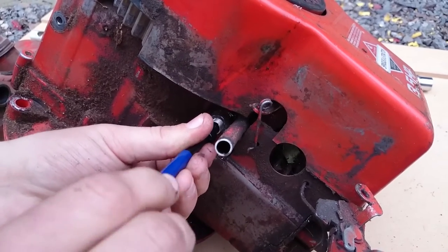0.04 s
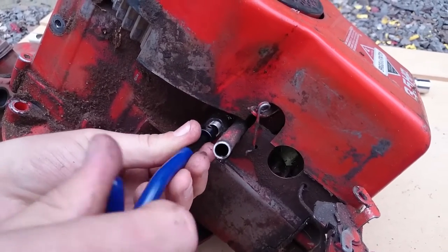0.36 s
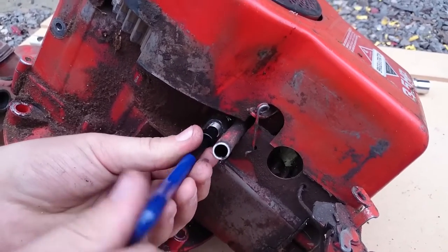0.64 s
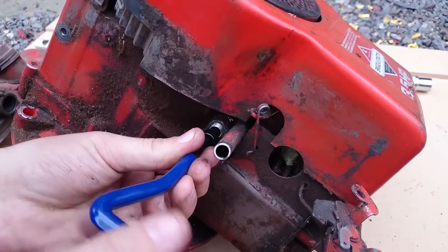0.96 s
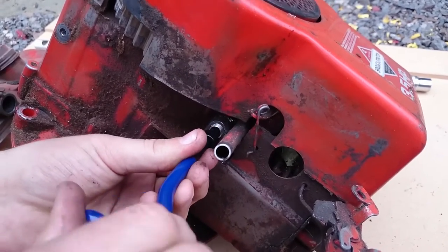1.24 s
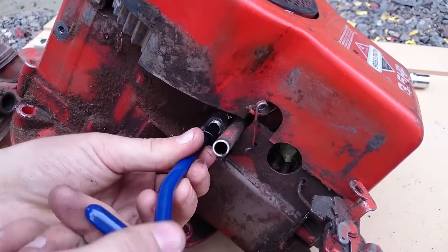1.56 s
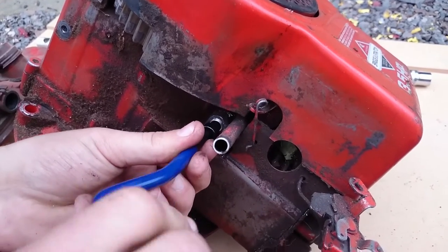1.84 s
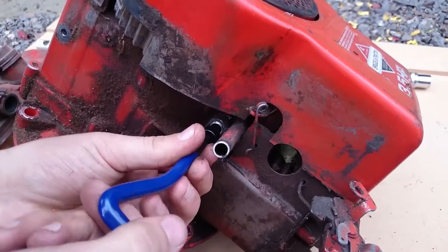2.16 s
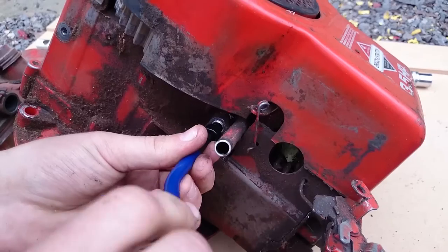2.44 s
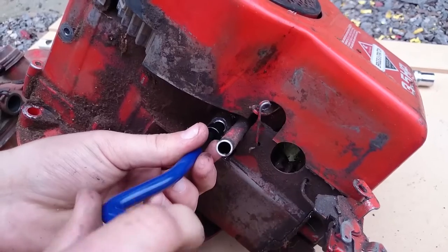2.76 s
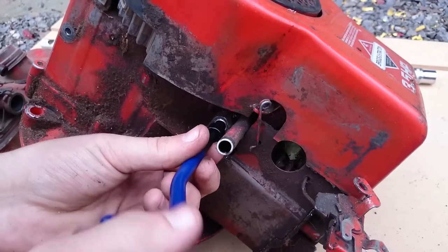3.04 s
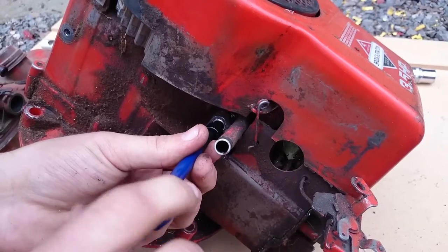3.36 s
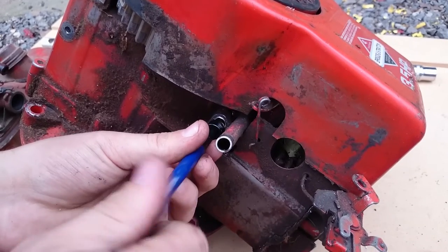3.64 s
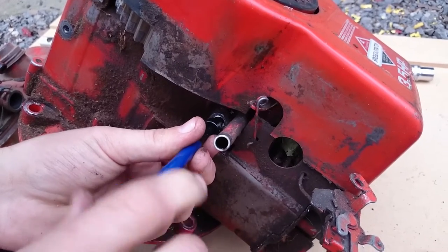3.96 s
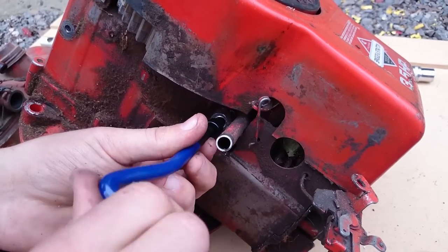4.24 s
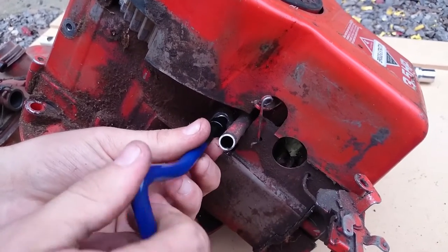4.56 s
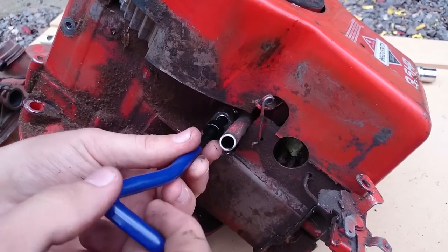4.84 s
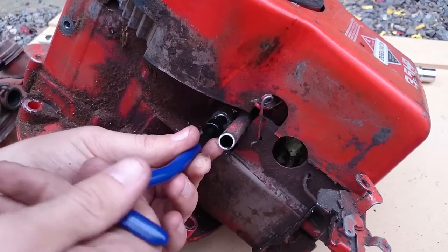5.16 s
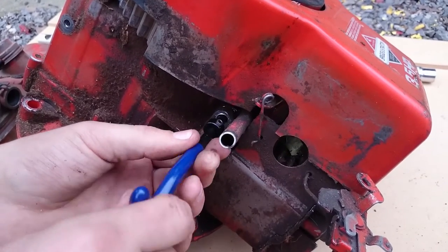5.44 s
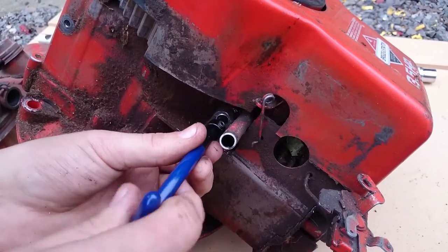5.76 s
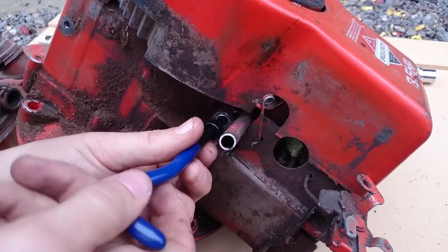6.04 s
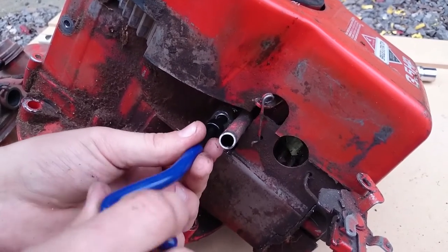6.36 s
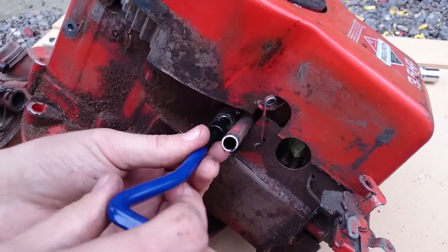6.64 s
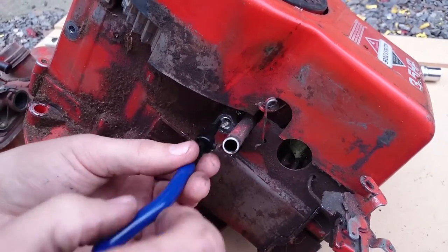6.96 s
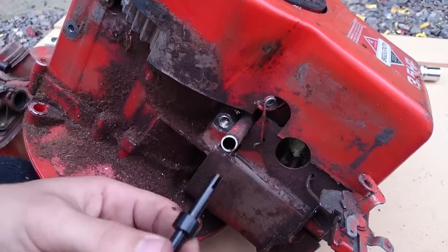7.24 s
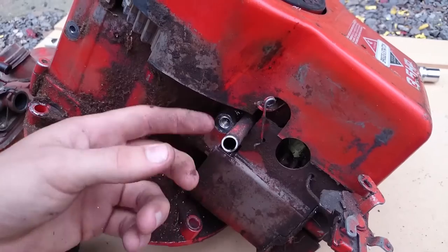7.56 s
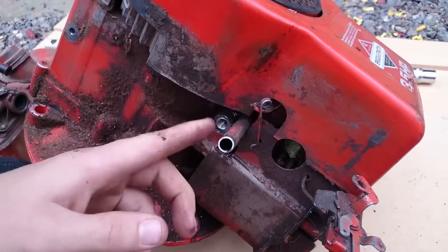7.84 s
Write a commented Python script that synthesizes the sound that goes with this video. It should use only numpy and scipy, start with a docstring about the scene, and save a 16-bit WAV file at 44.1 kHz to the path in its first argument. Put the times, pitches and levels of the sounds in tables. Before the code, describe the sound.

A hand tool winds a coiled insert into a small engine's bolt hole, making light metallic rasps, about five a second, with small ringing ticks. The turns grow uneven, one sharp click stands out midway, and the scraping thins. Near the end hands bump softly, the tool clinks free, and a tiny squeak leads to one loud hollow knock. The microphone is close, outdoors, over quiet air and hiss.

```python
"""Winding in a thread insert

Outdoors, a stereo microphone close to a small engine. A cranked hand tool winds a coiled insert into a
bolt hole: each push rasps the coil along the thread, ringing the steel tool and the engine casing, and
the coil ticks as it slips. Hands bump softly, the casing clanks once, the tool clinks on its way out,
and a brief squeak leads to one hollow knock. Behind lie quiet air, hiss and, briefly, a thin tone."""
import sys
import numpy as np
from scipy import signal
from scipy.fft import rfft, irfft, next_fast_len
from scipy.io import wavfile

SR = 44100
rng = np.random.default_rng(int(sys.argv[2]) if len(sys.argv) > 2 else 0)


def transcribe(signal):
    """Save signal, clipped to [-1, 1], as a 16-bit WAV file at the path in sys.argv[1]."""
    frames = np.atleast_2d(signal).T
    limited = np.clip(frames, -1, 1)
    pcm = np.round(limited * 32767).astype(np.int16)
    wavfile.write(sys.argv[1], SR, pcm)


N = 352535
TIME = np.arange(N) / SR
AGE = np.arange(SR // 4) / SR  # seconds into one short sound
PORTS_AGREE_HZ = 1460  # below this, the engine sounds much alike at both microphone ports
LEAD_S = .05  # room for a push to fade in

# Levels in the tables are relative; each source sets its own overall gain.
# Spectra of the open air, the microphone's hiss, wind on its ports and the echo from nearby.
# Each row: frequency in Hz, noise density in dB.
AIR_SPECTRUM = [(70, -38), (130, -3), (230, -4.5), (400, -5.5), (700, -8), (1100, -9), (1550, -12),
                (2400, -15.5), (4100, -19), (4800, -22.5), (8000, -29), (12500, -48), (14000, -70)]
HISS_SPECTRUM = [(200, 8.5), (3000, 3.5), (6000, -5.5), (9000, -4), (12300, -5.5), (13500, -49),
                 (15500, -47)]
WIND_SPECTRUM = [(8.8, -26), (15, 5.5), (59, -9.5), (81, -7), (130, -16.5), (152, -26.5), (220, -20.5),
                 (290, -55.5), (480, -120)]
ECHO_SPECTRUM = [(100, -2), (600, 6), (2000, 0), (5000, -8), (9000, 5.5), (16000, -45)]
# Course of the open air, the wind, and a brief dip in the background. Each row: seconds, level in dB.
AIR_LEVELS = [(0.0, -64), (0.22, -72), (0.79, -65.5), (2.07, -64), (2.38, -65), (2.68, -64), (2.84, -65.5),
              (3.83, -64), (5.3, -66), (5.5, -70), (6.05, -67.5), (6.29, -63), (6.97, -60), (7.52, -65),
              (7.77, -65), (7.9, -61)]
WIND_LEVELS = [(0.0, -67.5), (2.16, -62), (2.99, -65.5), (3.69, -63), (3.96, -66.5), (4.31, -63),
               (6.01, -70.5), (6.67, -61.5), (7.9, -67.5)]
BACKGROUND_DIP = [(.2, 0), (.207, -9), (.26, -1.5), (.4, 1)]
# Likeness of diffuse sound at the two ports. Each row: frequency in Hz, correlation.
DIFFUSE_LIKENESS = [(60, 0.33), (130, 0.77), (290, 0.27), (640, 0.28), (1410, -0.3), (3100, 0.012),
                    (6820, -0.058), (15000, 0.07)]
# Where the engine sits in the stereo picture. Each row: frequency in Hz, left minus right in dB.
PORT_BALANCE = [(100, 5), (300, 4), (1500, 4), (2250, 4), (2900, 4), (4200, 4), (5200, -0.5), (6000, -21),
                (7500, -4.5), (10000, -2), (15000, -6)]
# Sharp metal ticks as the coil slips and, in the last row, one blunt clank on the casing.
# Each row: start in seconds, peak in dB, ring in Hz, ring level in dB, casing share in dB,
# build-up in seconds, grinding decay in seconds.
TICKS_AND_CLANK = [(0.185, -41, 4320, -3, -20, 0.00091, 0.0033), (.718, -42.5, 2990, 11, -26, .001, 0.0036),
                   (0.913, -22.5, 3930, -1, -25, 0.0035, 0.0067),
                   (1.108, -41, 4300, 1, -22, 0.0024, 0.0028), (1.771, -32, 4400, -4, -14, .002, .005),
                   (1.962, -30.5, 1500, -6, 6, .002, .008), (2.382, -29.5, 4770, 13, -28, 0.0023, 0.0019),
                   (2.552, -34.5, 3920, 6, 0, 0.0012, 0.0016), (2.699, -40, 2970, 2.5, 6, 0.00074, 0.003),
                   (3.094, -29, 1527, 16, -1, 0.0034, 0.017), (3.099, -32, 4350, 7, -24, 0.0021, 0.017),
                   (3.729, -12, 4380, -.5, -4.5, 0.0044, 0.0033),
                   (3.771, -26.5, 3040, -7, -11, 0.0013, .003),
                   (4.359, -35.5, 3370, 2, -12, 0.0015, 0.0033), (4.463, -45, 4260, -3, 2, 0.0016, .004),
                   (4.74, -53, 4400, 0, -14, 0.00089, .003), (4.814, -47, 4450, -8.5, -17, 0.00087, .003),
                   (5.266, -42, 1930, 3, 0, 0.0012, 0.0029), (6.004, -42, 3180, -8, -12, 0.0006, 0.0019),
                   (6.276, -49, 1920, 2, 12, 0.00085, 0.0055), (6.536, -36.5, 2910, 3, -4, 0.00062, 0.0012),
                   (6.804, -43, 2960, 11, -9, .001, 0.0033), (6.8282, -22, 3260, -2.5, 6, 0.00027, 0.0073)]
# Resonances of tool and coil, and of the casing. Each row: frequency in Hz, nominal width in Hz,
# level in dB.
STEEL_RESONANCES = [(3030, 42, -5), (3197, 33, 5.5), (3745, 58, 0.5), (3760, 110, -3), (4220, 170, 5.5),
                    (4900, 40, 2), (5420, 90, 0), (5840, 100, -7.5), (6510, 86, -9), (6950, 74, -4),
                    (7590, 82, -3.5), (9630, 120, -25), (9940, 57, -21), (11400, 90, -31),
                    (12100, 160, -22)]
CASING_RESONANCES = [(353, 90, -15), (682, 82, 1), (825, 50, -3), (966, 67, -4.5), (1333, 41, -3.5),
                     (1502, 41, -0.5), (1652, 78, -8.5), (1896, 70, -2), (2194, 135, -3.5), (2404, 36, -5)]
# The steel's high zing, strong when it turns freely, choked as it binds. Each row: seconds, gain in dB.
ZING_LEVELS = [(.5, 2.5), (.92, 9), (1.4, 6.5), (2.15, 2.5), (2.55, -3.5), (3.1, -0.5), (3.75, 2),
               (4.4, -13), (5.8, -8), (6, 7), (6.83, 5), (7.4, -6)]
# Crowds of weak modes between each object's strong ones. Each row: frequency in Hz, density in dB.
STEEL_WEAK_MODES = [(1350, -45), (2300, -16), (2680, -10), (3000, 3), (3440, -9), (3880, 0), (5480, -4),
                    (6080, -17.5), (7730, -15.5), (8590, -20.5), (12300, -19), (13400, -36), (15700, -40)]
CASING_WEAK_MODES = [(88, -52), (150, -20), (372, -3.5), (541, -3.5), (680, -15), (1200, -5), (1470, 4),
                     (1750, -5), (2170, -64), (2700, -1.5), (3510, -32), (5940, -120)]
TIP_WEAK_MODES = [(120, -51), (200, -21), (643, -12.5), (910, -18), (1920, -13.5), (2070, -23), (2310, -7),
                  (3920, -18), (4210, -6.5), (5250, -1.5), (6300, -21.5), (8130, -17), (11100, -25.5),
                  (15700, -56)]
HOLLOW_WEAK_MODES = [(25, -32), (60, -19), (150, -7), (270, -25), (550, 4.5), (1100, -7), (1450, -16),
                     (2250, -9), (2800, -18), (5000, -19), (9000, -34)]
# Pushes of the crank. Each row: start and length in seconds, then steel level, casing level,
# swell over the push, deep groan and fine grit, all in dB.
CRANK_PUSHES = [ (0.467, 0.057, -59.5, -66, -9, -4, 0.5), (.662, 0.062, -58.5, -63.5, 1, -3, 4),
                (0.869, 0.05, -56, -56, -1, -1, -2), (0.919, .032, -46, -50.5, -14, -6, 5),
                (1.109, 0.056, -56, -58.5, 2.5, -4, 9), (1.322, 0.047, -46, -50.5, 0, 0.5, 7),
                (1.53, .044, -48.5, -48.5, 1, 0, 8), (1.738, .042, -45.5, -47.5, 2, 1, 7),
                (1.937, .046, -45.5, -46, 13, -3, 8), (2.146, .038, -45, -48, 5, -4, 9),
                (2.342, .034, -48, -45, 7.5, -6, 6), (2.54, .026, -50.5, -51.5, 1, -5, 8),
                (2.755, .16, -67, -78, -2, -3, 7), (3.038, 0.059, -58, -56, 5, -2, 4.5),
                (3.1, .112, -52.5, -48, -27, 3.5, 4), (3.672, .033, -49, -45.5, 4, 3.5, 4.5),
                (3.733, .082, -43.5, -43.5, -30, 0, 2.5), (4.357, .076, -51, -56, -2, 1, -5),
                (4.465, .06, -54.5, -55.5, -5, 2.5, -8), (4.798, 0.024, -61.5, -56, 2, 3, -3),
                (5.786, 0.073, -66, -67.5, -3.5, 2, -5), (6.766, 0.049, -65.5, -57.5, -1, 2.5, -7),
                (7.365, .055, -66, -67, -6, 1, -6.5)]
# A faint background tone. Each row: time in seconds, pitch in Hz, level in dB.
THIN_TONE_PATH = [(6.12, 1272, -74), (6.13, 1288, -70), (6.44, 1242, -68.5), (6.45, 1302, -71)]
# Contacts of the hands, the tool tip and the hollow body. Each row: start in seconds, peak in dB.
HAND_BUMPS = [(6.466, -48), (6.618, -53), (6.678, -49), (6.732, -35), (7.108, -46), (7.15, -41.5),
              (7.167, -33.5), (7.413, -47.5)]
TIP_STRIKES = [(6.9349, -24.5), (6.94, -19.5), (6.9584, -26), (6.9636, -18.5), (6.968, -19),
               (6.9747, -23.5)]
HOLLOW_KNOCKS = [(7.9237, -1)]
# Modes those contacts ring. Each row: frequency in Hz, level in dB, seconds to fall 60 dB.
THUD_MODES = [(258, 2.5, 0.029), (327, 1, 0.062), (465, -2.5, 0.034), (650, -15, .04)]
TIP_MODES = [(2250, -18.5, 0.097), (3440, -22, .05), (4496, -7, 0.051), (4400, -4, 0.042), (4960, 2, 0.029),
             (5270, -5, 0.021), (5750, -16, 0.028), (7030, -12, 0.036), (7930, -13, 0.039)]
HOLLOW_MODES = [(243, -2, 0.08), (316, 2, 0.063), (471, 7, 0.05), (613, -0.5, 0.065), (737, 2, 0.03),
                (1067, 1, 0.028), (1640, -18, 0.035), (2080, 1, 0.02), (2198, 3, 0.027),
                (3240, -5.5, 0.024), (4600, -11, 0.025), (5320, -9.5, 0.015)]
# A squeaking rub. Each row: start in seconds, length in seconds, peak in dB.
SQUEAK_RUBS = [(7.822, 0.027, -31)]
# Its partials. Each row: frequency in Hz, level in dB.
SQUEAK_PARTIALS = [(1310, -1), (2990, -1), (4480, -15), (753, -13)]


def from_db(db):
    """Decibels to gain."""
    return 10 ** (np.asarray(db) / 20)


def rms_one(x):
    """Scale to unit rms."""
    return x / np.sqrt(np.mean(x ** 2) + 1e-20)


def unit_energy(h):
    """Scale a stereo response so that it passes noise at the same level."""
    return h / np.sqrt(np.sum(h ** 2) / 2)


def at_peak(sound, db):
    """Scale a sound to a peak level."""
    return from_db(db) * sound / np.abs(sound).max()


def at_hz(points, hz):
    """Read a table on a log-frequency axis."""
    f, value = np.transpose(points)
    return np.interp(np.log(np.maximum(hz, 1)), np.log(f), value)


def gain_curve(rows):
    """Gain over time from rows of seconds and dB."""
    return from_db(np.interp(TIME, *np.transpose(rows)))


def decay(t60, age=AGE):
    """A fall of 60 dB every t60 seconds."""
    return np.exp(-np.log(1000) * age / t60)


def drift(rate, time=TIME):
    """A random wander of unit rms, with `rate` turning points a second."""
    knots = rng.standard_normal(int(time[-1] * rate) + 2)
    return rms_one(np.interp(time * rate, np.arange(len(knots)), knots))


def tinted(x, colour):
    """Reshape a spectrum by rows of Hz and dB."""
    return irfft(rfft(x) * from_db(at_hz(colour, np.fft.rfftfreq(len(x), 1 / SR))), len(x))


def through(x, response):
    """Play a signal through a stereo response."""
    return signal.fftconvolve(np.atleast_2d(x), response, axes=1)[:, :N]


def add(out, start, sound):
    """Place a sound at a time in seconds."""
    i = round(start * SR)
    out[:, i:i + sound.shape[1]] += sound[:, :N - i]


def ports(hz):
    """Gain of the left and right microphone port for sound from the engine."""
    return from_db(np.outer([1, -1], at_hz(PORT_BALANCE, hz)) / 2)


def noise(spectrum, size=len(AGE), diffuse=False):
    """Coloured stereo noise, from the engine or from all around; most alike in the bass."""
    hz = np.fft.rfftfreq(size, 1 / SR)
    mid, side = rfft(rng.standard_normal((2, size)))
    alike = at_hz(DIFFUSE_LIKENESS, hz) if diffuse else 1 / (1 + (hz / PORTS_AGREE_HZ) ** 2)
    pair = np.sqrt(1 + alike) * mid + np.sqrt(1 - alike) * side * [[1], [-1]]
    balance = 1 if diffuse else ports(hz)
    return rms_one(irfft(pair * from_db(at_hz(spectrum, hz)) * balance, size))


def ringing(modes, scatter=0.8, right_lag_s=.0001):
    """Decaying sines; they reach the right port later, the high ones with a phase of their own."""
    out = np.zeros((2, len(AGE)))
    age = np.maximum(AGE - np.array([[0], [right_lag_s]]), 0)
    for k, (hz, db, t60) in enumerate(modes):
        phase = rng.normal(0, scatter, (2, 1)) * min(hz / PORTS_AGREE_HZ, 1)
        wave = (-1) ** k * np.sin(2 * np.pi * hz * age + phase) * (age > 0)
        out += ports([hz]) * from_db(db) * decay(t60, age) * wave
    return unit_energy(out)


def as_modes(resonances, stretch, vary_db=0):
    """A wide resonance is a strong, short ring; stretch lengthens it, vary_db scatters its strength."""
    return [(hz, db + 20 * np.log10(width) + rng.normal(0, vary_db),
             stretch * np.log(1000) / (np.pi * width)) for hz, width, db in resonances]


def body(modes, crowd, crowd_db, crowd_t60):
    """An object's answer to one impulse: strong modes over a crowd of weak ones."""
    weak = noise(crowd) * decay(crowd_t60)
    return unit_energy(ringing(modes) + from_db(crowd_db) * unit_energy(weak))


def air(air_db=3.0, hiss_db=-69.8, wind_db=6.8, waver_db=2.0, gust_db=3.0):
    """Open air a little to the left, microphone hiss, and light wind on the ports, more on the right."""
    wash, hiss, wind = (noise(spectrum, next_fast_len(N), diffuse=True)[:, :N]
                        for spectrum in (AIR_SPECTRUM, HISS_SPECTRUM, WIND_SPECTRUM))
    wash *= gain_curve(AIR_LEVELS) * from_db(air_db + waver_db * drift(26))
    wind *= gain_curve(WIND_LEVELS) * from_db(wind_db + gust_db * drift(14))
    return wash * from_db([[1.37], [-1.37]]) + from_db(hiss_db) * hiss + wind * from_db([[-2], [2]])


def steel(start, zing_hz=5900, zing_width_hz=1400):
    """Tool and coil, damped by the fingers, with as much zing as they have at this moment."""
    modes = as_modes(STEEL_RESONANCES, stretch=0.7)
    response = body(modes, STEEL_WEAK_MODES, crowd_db=3.5, crowd_t60=0.026)
    zing = signal.lfilter(*signal.iirpeak(zing_hz, zing_hz / zing_width_hz, fs=SR), response)
    zing_db = np.interp(start, *np.transpose(ZING_LEVELS))
    return response + (from_db(zing_db) - 1) * zing


def casing():
    """The engine casing; each new point of contact favours different modes."""
    modes = as_modes(CASING_RESONANCES, stretch=1.63, vary_db=2.0)
    return body(modes, CASING_WEAK_MODES, crowd_db=-2.0, crowd_t60=0.043)


def groan_and_grit(force, groan_db, grit_db):
    """Bass and treble of a force: a binding coil groans coarsely, a free one hisses finely."""
    groan = tinted(force, [(760, 1), (1250, -24.5)])
    grit = tinted(force, [(5000, -37), (9000, -0.5)])
    return force + groan * (from_db(groan_db) - 1) + grit * (from_db(grit_db) - 1)


def ticks_and_clank(gain_db=1.5, ring_t60=.028):
    """Sharp metal ticks as the coil slips, and one blunt clank on the casing: each grinds and rings."""
    out = np.zeros((2, N))
    for start, db, hz, ring_db, casing_db, build_s, grind_s in TICKS_AND_CLANK:
        burst = np.minimum(AGE / build_s, 1) ** 2 * np.exp(-np.maximum(AGE - build_s, 0) / grind_s)
        # a harder contact is brighter; one that mostly thumps the casing is blunt
        grit_db = .2 * (db + 25) - 1.4 * max(casing_db, 0)
        force = burst * groan_and_grit(rng.standard_normal(len(AGE)), groan_db=0, grit_db=grit_db)
        grinding = through(force, steel(start) + from_db(casing_db) * casing())
        # the burst also drives one ring of the metal at its own pitch
        singing = through(burst * np.sin(2 * np.pi * hz * AGE), ringing([(hz, 0, ring_t60)]))
        contact = unit_energy(grinding) + from_db(ring_db) * unit_energy(singing)
        add(out, start, at_peak(contact, db + gain_db))
    return out


def dry_click(start=.2015, peak_db=-41):
    """A faint one-sample click as the background dips."""
    out = np.zeros((2, N))
    add(out, start, np.full((2, 1), from_db(peak_db)))
    return out


def scrape(start, length, steel_db, casing_db, swell_db, groan_db, grit_db,
           slips_per_s=5000, spread_db=3.3, judder_db=2.2, grip_db_per_s=1002, let_go_db_per_s=902):
    """Thousands of tiny slips a second, coil against thread, shake both the steel and the casing."""
    size = len(AGE)
    slip_db = spread_db * np.minimum(rng.exponential(1, size), 4) + judder_db * drift(219.7, AGE)
    kicks = from_db(slip_db) * rng.choice([-1, 1], size)
    slips = rms_one(kicks * (rng.random(size) < slips_per_s / SR))
    age = AGE - LEAD_S
    progress = np.clip(age / length, 0, 1)
    edges_db = grip_db_per_s * np.minimum(age, 0) - let_go_db_per_s * np.maximum(age - length, 0)
    ramp_db = swell_db * (progress - .5)
    # the fine grit follows the swell less than the rest does
    force = groan_and_grit(slips, groan_db, grit_db - .35 * ramp_db) * from_db(edges_db + ramp_db)
    # pressure is greatest in mid-push, and the casing feels it most
    arch_db = np.sin(np.pi * progress) - 1
    steel_ring = through(force * from_db(steel_db + arch_db), steel(start))
    casing_ring = through(force * from_db(casing_db + 4.5 * arch_db), casing())
    return steel_ring + casing_ring


def crank_rasp(gain_db=1.8, free_until_s=2.45, settle_delay_s=.039):
    """Each push scrapes the coil along; while the crank spins freely, the tool settles after each."""
    out = np.zeros((2, N))
    for start, length, *levels in CRANK_PUSHES:
        add(out, start - LEAD_S, scrape(start, length, *levels))
        if start < free_until_s:
            settling = scrape(start, length=0.011, steel_db=-63, casing_db=-64,
                              swell_db=-0.5, groan_db=-4, grit_db=-1)
            add(out, start + length + settle_delay_s - LEAD_S, settling)
    return from_db(gain_db) * out


def thin_tone(gain_db=1.5, waver_hz=12, flutter_db=3.0, fade_s=.015):
    """A faint background tone that wavers in pitch and level."""
    times, hz, db = np.transpose(THIN_TONE_PATH)
    pitch = np.interp(TIME, times, hz) + waver_hz * drift(60)
    fade_in = np.clip((TIME - times[0]) / fade_s + 1, 0, 1)
    fade_out = np.clip((times[-1] - TIME) / fade_s + 1, 0, 1)
    level = from_db(np.interp(TIME, times, db) + gain_db + flutter_db * drift(25))
    return fade_in * fade_out * level * np.sqrt(2) * np.sin(2 * np.pi * np.cumsum(pitch) / SR)


def hand_bumps(soft_hz=600, gain_db=2.5):
    """Flesh makes a slow contact, so only low modes answer."""
    out = np.zeros((2, N))
    lowpass = signal.butter(2, soft_hz, fs=SR, output="sos")
    for start, db in HAND_BUMPS:
        thud = signal.sosfilt(lowpass, ringing(THUD_MODES, scatter=0.41))
        add(out, start, at_peak(thud, db + gain_db))
    return out


def tool_clinks(grind_s=0.0045, grind_db=-4.5, gain_db=3.0, shimmer_db=-22.0, shimmer_t60=0.34):
    """The freed tool chatters on the rim of the hole: each time a tap, a short scrape and a shimmer."""
    out = np.zeros((2, N))
    for start, db in TIP_STRIKES:
        force = rng.standard_normal(len(AGE)) * np.exp(-AGE / grind_s)
        force *= from_db(grind_db) / np.linalg.norm(force)
        force[0] += 1  # the tap
        shimmer = from_db(shimmer_db) * unit_energy(noise(TIP_WEAK_MODES) * decay(shimmer_t60))
        tip = body(TIP_MODES, TIP_WEAK_MODES, crowd_db=-2.0, crowd_t60=0.043)
        add(out, start, at_peak(through(force, tip + shimmer), db + gain_db))
    return out


def squeak(t60=.4):
    """A rub that sticks and sings for an instant."""
    out = np.zeros((2, N))
    for start, length, db in SQUEAK_RUBS:
        swell = np.sin(np.pi * np.minimum(AGE / length, 1)) ** 2
        tone = ringing([(hz, partial_db, t60) for hz, partial_db in SQUEAK_PARTIALS])
        add(out, start, at_peak(swell * tone, db))
    return out


def hollow_knock(soft_hz=5500, tail_db=-15.5, tail_t60=0.23):
    """A hard knock on a hollow, well damped body, with a dull tail."""
    out = np.zeros((2, N))
    lowpass = signal.butter(4, soft_hz, fs=SR, output="sos")
    for start, db in HOLLOW_KNOCKS:
        tail = from_db(tail_db) * unit_energy(noise(HOLLOW_WEAK_MODES) * decay(tail_t60))
        hit = body(HOLLOW_MODES, HOLLOW_WEAK_MODES, crowd_db=-11.0, crowd_t60=0.05)
        add(out, start, at_peak(signal.sosfilt(lowpass, hit + tail), db))
    return out


def surroundings(near, wet_db=-26.0, t60=0.13, build_s=0.0044):
    """A faint, short scatter from the ground and things nearby."""
    tail = noise(ECHO_SPECTRUM, diffuse=True) * decay(t60) * (1 - np.exp(-AGE / build_s))
    return from_db(wet_db) * through(near, unit_energy(tail))


def scene():
    """Tool, casing and hands close to the microphone, with open air behind."""
    near = crank_rasp() + ticks_and_clank() + tool_clinks() + hand_bumps() + hollow_knock() + squeak()
    background = air() * gain_curve(BACKGROUND_DIP) + dry_click() + thin_tone()
    return near + surroundings(near) + background


def record(dry):
    """The recorder rounds the loudest peaks and cuts the top of the band."""
    ceiling, cutoff_hz = 0.7, 15700
    rounded = ceiling * np.tanh(dry / ceiling)
    return signal.sosfilt(signal.ellip(10, .1, 80, cutoff_hz, fs=SR, output="sos"), rounded)


dry = scene()
out = record(dry)
transcribe(out)
```